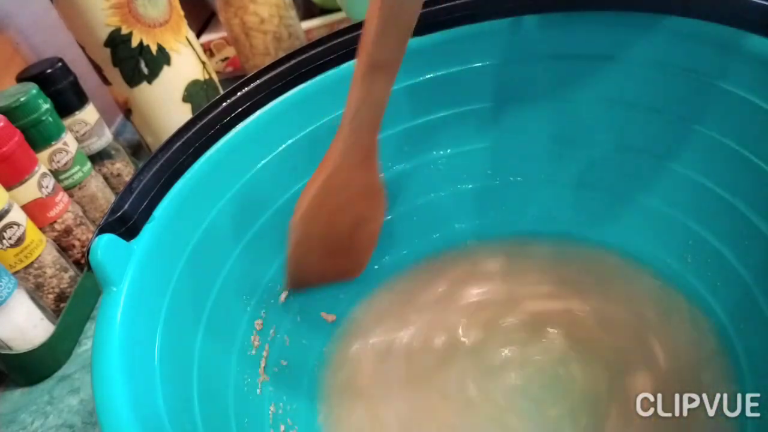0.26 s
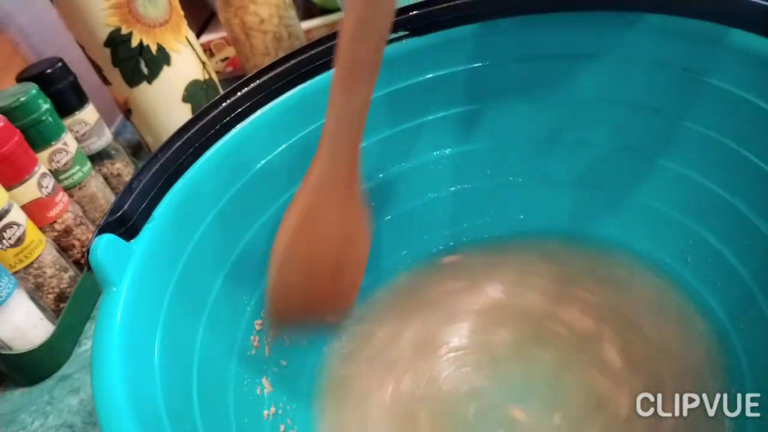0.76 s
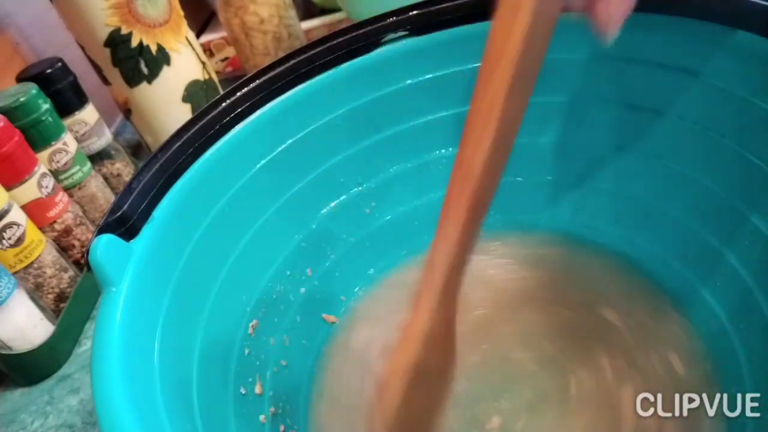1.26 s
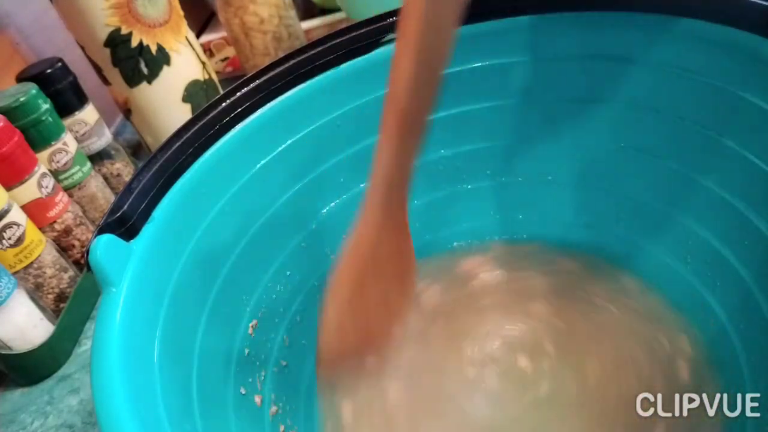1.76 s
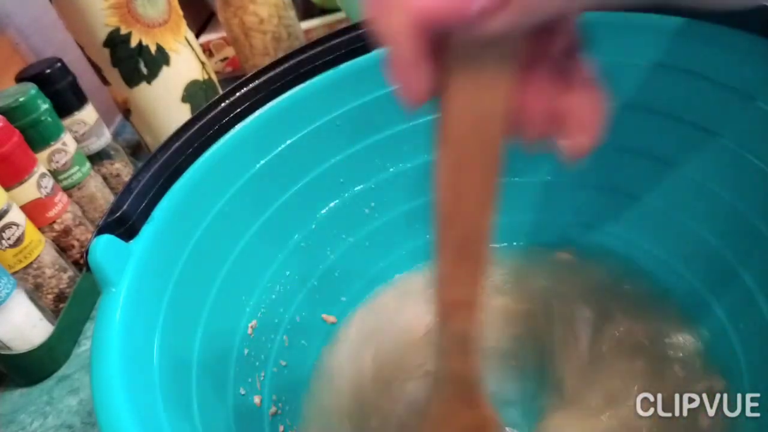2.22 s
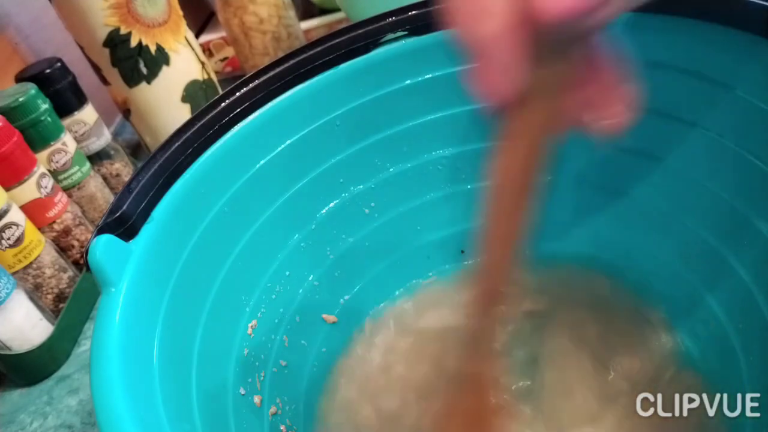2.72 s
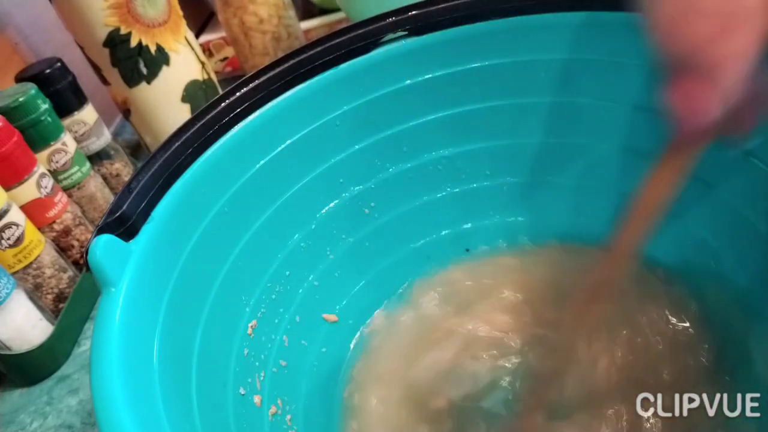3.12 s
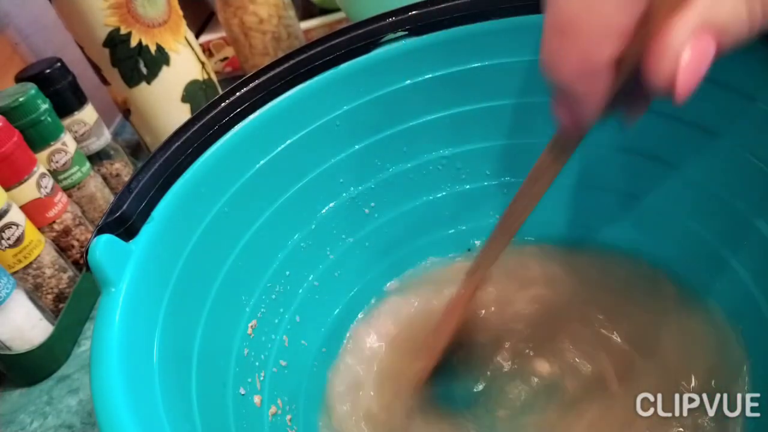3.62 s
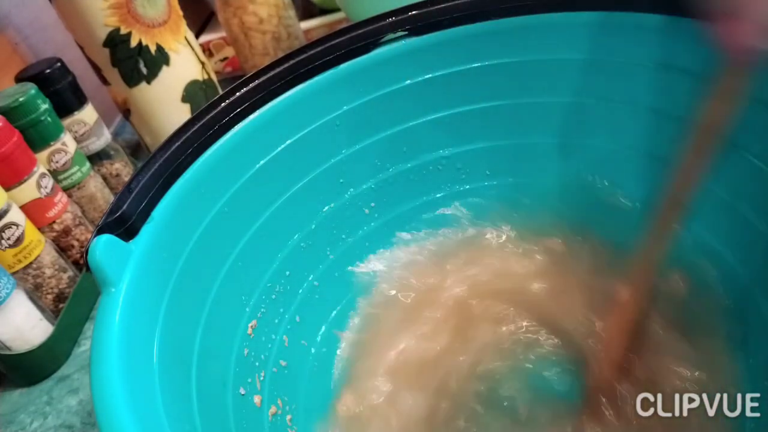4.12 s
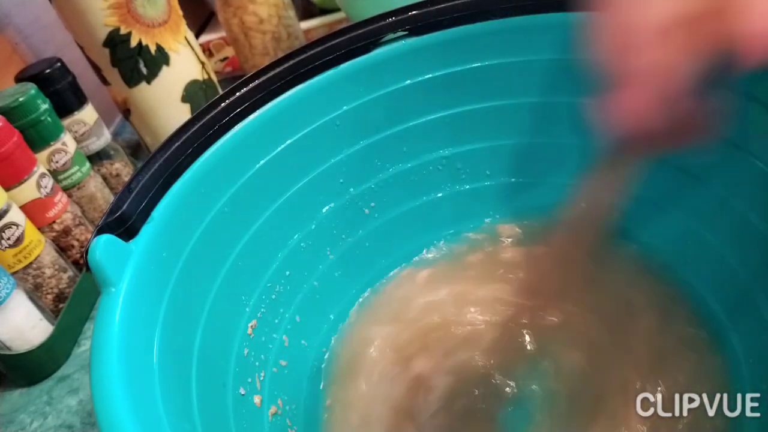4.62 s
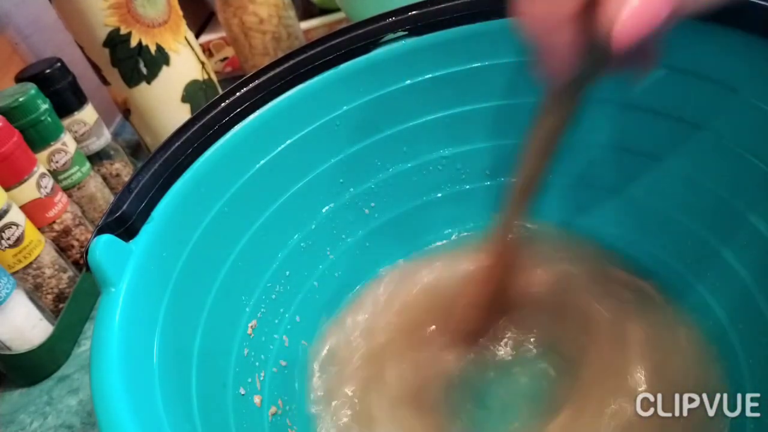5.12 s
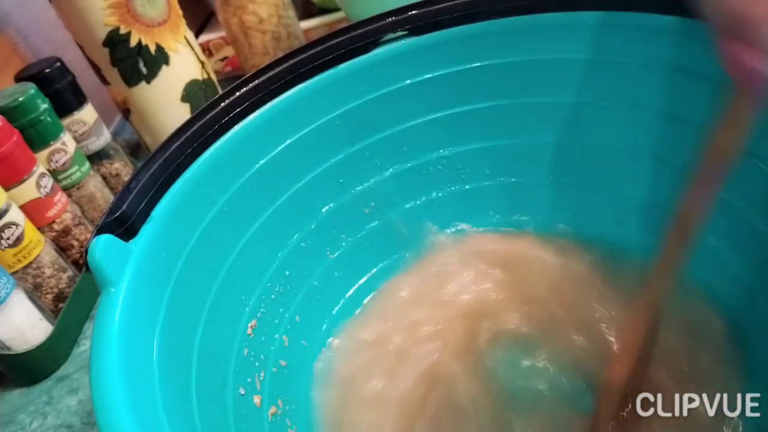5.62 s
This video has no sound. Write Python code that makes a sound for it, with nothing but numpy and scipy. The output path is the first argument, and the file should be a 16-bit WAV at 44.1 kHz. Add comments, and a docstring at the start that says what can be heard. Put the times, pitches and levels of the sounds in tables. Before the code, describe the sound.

A wooden spoon works in a large plastic bowl, close to the microphone in a small, quiet kitchen with very little echo. For the first 1.7 seconds it makes light, separate scrapes on the wet wall, with soft hollow thumps around 0.4, 0.8 and 1.2 seconds, tiny gritty ticks and near silence between strokes. At about 1.9 seconds fast, continuous stirring of thin liquid begins. The stretch up to 3 seconds is the loudest, with low, quickly damped bowl knocks, wooden clacks and splashy plops. From 3 seconds the knocks fall back and the liquid takes over, sloshing and gurgling in quick, uneven surges with a fizzy wet hiss, small bubble pops and sharp droplet clicks, one standing out near 3.8 seconds. Soft bowl thumps return from about 5 seconds, with a firmer one near 5.7, and the stirring continues to the end, just before 6 seconds.

```python
"""Wooden spoon stirring thin liquid

A large plastic bowl, close up in a small kitchen. The spoon scrapes the wall, thumps the bowl's low
modes, clacks and traps air pockets that plop; grit ticks under its edge and films of liquid snap.
Bowl and kitchen ring briefly; between strokes it is almost silent."""
import sys
import numpy as np
from scipy import signal
from scipy.fft import rfft, irfft, next_fast_len
from scipy.io import wavfile
from scipy.ndimage import uniform_filter1d, map_coordinates

SR = 44100
rng = np.random.default_rng(int(sys.argv[2]) if len(sys.argv) > 2 else 0)


def wrap_up_sound(samples):
    """Save the sound to the file named by the first command line argument, as 16-bit audio."""
    columns = np.atleast_2d(samples).T
    # keep every value between -1 and 1, then stretch to whole-number steps
    tamed = np.clip(columns, -1, 1)
    steps = np.round(tamed * 32767).astype(np.int16)
    wavfile.write(sys.argv[1], SR, steps)


N = 258853


def amp(db):
    """dB to gain."""
    return 10 ** (np.asarray(db) / 20)


def unit(x):
    """Scale to rms 1."""
    return x / np.sqrt(np.mean(x ** 2) + 1e-20)


def pan(balance_db):
    """Stereo gains for a left-over-right balance."""
    return amp([[balance_db / 2], [-balance_db / 2]])


def along(points, hz):
    """Interpolate (Hz, value) points on a log axis."""
    knot_hz, values = np.transpose(points)
    return np.interp(np.log(hz + 1), np.log(knot_hz + 1), values)


def wobble(rate_hz):
    """Smooth random curve."""
    knots = rng.standard_normal(int(N * rate_hz / SR) + 4)
    return map_coordinates(knots, [np.arange(N) * rate_hz / SR])


def filtered(x, response):
    """Apply a complex frequency response."""
    size = next_fast_len(N + SR // 2)
    return irfft(rfft(x, size) * response(np.fft.rfftfreq(size, 1 / SR)), size)[..., :N]


def low_cut(hz, corner_hz):
    """Fourth-order high-pass gain."""
    return 1 / (1 + (corner_hz / (hz + 1)) ** 4)


def resonant(modes, hz):
    """Causal response of (Hz, width Hz, dB) resonances, alternating in sign."""
    return sum((-1) ** k * amp(db) * 1j * hz * width_hz / (mode_hz ** 2 - hz ** 2 + 1j * hz * width_hz)
               for k, (mode_hz, width_hz, db) in enumerate(modes))


def gritty(response, grain_db, lump_db, patchy_db, width):
    """Coloured stereo noise, rms 1, uneven in fast grains, slow lumps and time-frequency patches."""
    # Each row: frequency in Hz, left-right likeness at width 1.
    likeness = [(60, 0.63), (180, 0.24), (550, 0.077), (1650, 0.06), (4970, 0.15), (15000, 0.097)]
    spectrum = signal.stft(rng.standard_normal((2, N)), nperseg=256)[2]
    patches = uniform_filter1d(rng.standard_normal(spectrum.shape[1:]), size=2, axis=0)
    patches = unit(uniform_filter1d(patches, size=14, axis=1))
    noise = signal.istft(spectrum * amp(patchy_db * patches), nperseg=256)[1][:, :N]
    noise *= amp(grain_db * wobble(600) + lump_db * wobble(45))
    angle = lambda hz: width * np.arccos(np.clip(along(likeness, hz), -1, 1)) / 2
    mid, side = filtered(noise, lambda hz: response(hz) * [np.cos(angle(hz)), np.sin(angle(hz))])
    return unit(np.array([mid + side, mid - side]))


def bubbles(low_hz, high_hz, decay_cycles, count):
    """Small bubbles ring with rising pitch at random times and pans; rms 1."""
    when, pitch, level, side = rng.random((count, 4)).T[:, :, None]
    t = np.arange(SR // 40) / SR
    cycles = low_hz * (high_hz / low_hz) ** pitch * t
    envelope = amp(12 * level) * np.exp(-cycles / decay_cycles) * (1 - np.exp(-cycles))
    rings = envelope * np.sin(2 * np.pi * cycles * (1 + 0.01 * cycles / decay_cycles))
    index = ((when * N).astype(int) + np.arange(len(t))).ravel()
    gains = np.cos(np.pi / 2 * side), np.sin(np.pi / 2 * side)
    return unit(np.array([np.bincount(index, (rings * gain).ravel(), N + SR)[:N] for gain in gains]))


def add(track, start_s, sound):
    """Mix a sound into a track."""
    first = round(start_s * SR)
    track[..., first:first + sound.shape[-1]] += sound


def still_air():
    """Faint, mostly low noise of the still kitchen."""
    # Each row: frequency in Hz, relative density in dB.
    colour = [(18, -44.5), (30, -20.5), (176, 8.5), (581, -24), (815, -29), (1270, -18), (2190, -34),
              (15000, -39.5)]
    noise = gritty(lambda hz: amp(along(colour, hz)), grain_db=4.5, lump_db=1, patchy_db=-2.5, width=1.1)
    return amp(-79.5) * noise


def stroke_levels_db():
    """Rumble, slosh, rub and hiss: each drag rises, holds and dies at the lift, over swirling liquid."""
    # Each row: start, rise and hold in seconds, rub level in dB, change over the hold in dB,
    # slosh and hiss over the rub in dB.
    drags = [(.05, 0.036, 0.0062, -46, 3.5, -38, 0), (.188, 0.0027, 0.1, -36.5, -33, 2, -5),
             (0.2, 0.031, 0.035, -53, -7, 9, 10), (0.303, 0.048, 0.0045, -56.5, -2.5, -3, 6),
             (0.362, 0.038, .01, -55.5, 3.5, -3, 7), (0.408, .002, 0.099, -33.5, -22.5, -5, -2.5),
             (0.695, 0.0025, 0.1, -31.5, -21.5, 0, -7.5), (0.786, .002, 0.079, -34.5, -23, -4, 2.5),
             (.877, 0.022, 0.065, -43.5, -21.5, -17, 5.5), (1.049, .045, 0.0074, -49.5, -12, -19, 6),
             (1.114, .008, 0.11, -49.5, -5, -21, 5.5), (1.185, .002, 0.099, -29.5, -36.5, -6, -8),
             (1.449, .002, 0.084, -35.5, -10.5, 2, -3.5), (1.533, 0.035, 0.047, -38.5, -10, -5, 8),
             (1.883, .002, 0.084, -36.5, -2, 10.5, -15), (1.979, 0.02, 0.014, -27.5, -14, -22, -10),
             (1.989, 0.082, 0.031, -44.5, -0.5, 6, 12), (2.087, .05, 0.033, -32, -9, 9, -6.5),
             (2.203, .002, 0.052, -18.5, -17.5, 3.5, -14.5), (2.238, .034, 0.023, -23.5, -6.5, -3, -3.5),
             (2.297, 0.019, 0.084, -24, -28, 6, -7.5), (2.455, .002, 0.014, -38, -12.5, 16, 0),
             (2.481, 0.066, 0.12, -38, -13.5, 1.5, -2), (2.608, 0.036, 0.07, -25.5, -22, -3, -9),
             (2.744, .002, 0.098, -33.5, -10, 2, -4.5), (2.885, .002, 0.052, -25.5, -13.5, -4, -8.5),
             (2.935, 0.0043, 0.093, -21, -20.5, 0.5, -8.5), (3.041, .002, 0.076, -20.5, -25, -18, -6.5),
             (3.118, .012, 0.021, -39, -13, 7.5, -4), (3.156, 0.028, 0.071, -39.5, -15, 11.5, -4),
             (3.292, 0.031, 0.08, -26, -10, -1, -6.5), (3.456, 0.0088, 0.15, -55.5, -11.5, 14, 3),
             (3.557, 0.084, 0.016, -37, 6.5, -14, -0.5), (3.642, .002, 0.15, -26, -6, -0.5, -5.5),
             (3.815, 0.0085, 0.1, -35, -5.5, -1, -1.5), (4, 0.0027, 0.11, -30.5, 0, -3, -4),
             (4.195, .003, .06, -45, -6.5, 4, 2), (4.3, 0.012, .02, -44, -5, 8, 3),
             (4.35, .002, 0.058, -38.5, -13.5, 9, 3.5), (4.396, 0.024, 0.091, -31, -7.5, 2.5, -6),
             (4.55, .01, 0.096, -45, -1, 6.5, 6), (4.719, .01, 0.024, -35.5, 2.5, -13, -2.5),
             (4.735, 0.039, 0.036, -25.5, -11, 8.5, -4.5), (4.785, 0.042, 0.034, -27.5, -8.5, 2.5, -3),
             (4.941, 0.012, 0.044, -43, 1, 12.5, 3), (4.959, 0.044, 0.084, -36.5, -9, 4, 10.5),
             (5.101, .012, 0.13, -35.5, 0.5, 3, 0), (5.313, 0.0026, 0.07, -44.5, 2, 7.5, 5),
             (5.407, .01, .02, -31.5, -10.5, -16, -3.5), (5.422, 0.027, 0.047, -44.5, 2, 8.5, 12),
             (5.454, 0.085, 0.092, -28.5, 1, 0.5, -3.5), (5.699, .003, 0.044, -28, -9.5, 3.5, -1.5),
             (5.723, .05, 0.1, -26.5, -9, -3.5, 1)]
    # Liquid moving between drags. Each row: time in seconds, swirl in dB, bowl rumble in dB.
    swirl = [(0, -78.5, -74.5), (1.0, -79, -71), (1.6, -99.5, -77), (1.72, -90, -81), (1.88, -101, -88),
             (2.02, -63.5, -37.5), (2.5, -49, -43), (2.95, -52, -42), (3.3, -50.5, -46), (3.5, -62, -67),
             (3.7, -44, -60), (4.25, -58.5, -49.5), (4.5, -59, -54.5), (4.9, -56.5, -51), (5.1, -64, -42.5),
             (5.3, -59.5, -45.5), (5.87, -45, -47.5)]
    t = np.arange(0, N, 32) / SR
    start_s, rise_s, hold_s, rub_db, change_db, slosh_db, hiss_db = np.transpose(drags)[:, :, None]
    held_s = t - start_s - rise_s

    def drag_power(over_db, change_share, lift_db_per_s):
        rising_db = 20 * np.minimum(held_s, 0) / np.maximum(rise_s, 1e-3)
        holding_db = change_share * change_db * np.clip(held_s / np.maximum(hold_s, 1e-3), 0, 1)
        lifting_db = -lift_db_per_s * np.maximum(held_s - hold_s, 0)
        return np.sum(amp(rub_db + over_db + rising_db + holding_db + lifting_db) ** 2, axis=0)

    slosh = drag_power(slosh_db, change_share=1.12, lift_db_per_s=494)
    rub = drag_power(0, change_share=1.03, lift_db_per_s=600)
    hiss = drag_power(hiss_db, change_share=0.74, lift_db_per_s=546)
    knot_s, swirl_db, rumble_db = np.transpose(swirl)
    swirl_power = lambda db: amp(np.interp(t, knot_s, db)) ** 2
    powers = [swirl_power(rumble_db) + amp(-15) ** 2 * slosh + amp(-8) ** 2 * hiss,
              swirl_power(swirl_db + 0.5) + slosh,
              swirl_power(swirl_db + 2) + rub,
              swirl_power(swirl_db + 4.5) + hiss]
    return [np.interp(np.arange(N) / SR, t, 10 * np.log10(power)) for power in powers]


def scrape():
    """The spoon drags on the wet wall: bowl rumble, hollow slosh, gurgling rub and fizzy hiss."""
    # Resonances the scrape excites. Each row: centre in Hz, width in Hz, gain in dB.
    low_modes = [(166, 35.4, -1), (200.7, 22, -3), (261, 77, -11.5)]
    wall_modes = [(1046, 230, 4), (1354, 120, 4.5), (1690, 130, 8.5), (2460, 1020, -6.5)]
    hollow_modes = [(345, 98, -4.5), (460, 69, 1), (523, 99, -0.5), (646, 57, 1.5), (845, 130, -5)]
    # Wet hiss. Each row: frequency in Hz, relative density in dB.
    hiss_colour = [(30, -20), (150, -34), (500, -12), (1470, -5.5), (2500, -8.5), (3370, -15.5),
                   (4550, -9.5), (5620, -9), (7750, 2.5), (8940, -11), (14100, -21.5), (14700, -15.5),
                   (15000, -66)]
    hiss_gain = lambda hz: amp(along(hiss_colour, hz))
    rumble_db, slosh_db, rub_db, hiss_db = stroke_levels_db()
    rumble = gritty(lambda hz: resonant(low_modes, hz) * low_cut(hz, 115),
                    grain_db=5, lump_db=4, patchy_db=-0.2, width=0.24)
    rub = gritty(lambda hz: resonant(wall_modes, hz) * low_cut(hz, 800),
                 grain_db=2.5, lump_db=0, patchy_db=4.5, width=1.166)
    slosh = gritty(lambda hz: resonant(hollow_modes, hz) * low_cut(hz, 200) / (1 + (hz / 1100) ** 4),
                   grain_db=2.5, lump_db=3.5, patchy_db=3.5, width=0.95)
    gurgle = filtered(bubbles(1001, 2800, decay_cycles=7.1, count=1200), lambda hz: low_cut(hz, 600))
    hiss = gritty(hiss_gain, grain_db=1.5, lump_db=1, patchy_db=5.5, width=0.86)
    fizz = unit(filtered(bubbles(2600, 11000, decay_cycles=39, count=3000), hiss_gain))
    drops = filtered(bubbles(1800, 7000, decay_cycles=12, count=250), lambda hz: low_cut(hz, 1200))
    return (amp(rumble_db) * rumble
            + amp(slosh_db - 2.5) * slosh
            + amp(rub_db) * (rub + amp(-8.5) * gurgle)
            + amp(hiss_db + 1.43) * (hiss + amp(-11) * fizz + amp(-18.5) * drops))


def ticks():
    """Grit and droplets under the spoon's edge: a sharp click and a short spray, ringing high."""
    # Each row: start in seconds, level in dB.
    events = [(0.0834, -20), (0.192, -23.5), (0.2289, -22.5), (0.4125, -15.5), (0.7881, -26.5),
              (1.1224, -23.5), (1.5497, -15.5), (1.5718, -12.5), (1.9121, -27), (2.0742, -22.5),
              (2.2563, -25.5), (2.2709, -5), (2.3965, -20), (2.4623, -23.5), (2.5077, -21.5), (2.5742, -11),
              (2.6184, -11.5), (2.9023, -13), (2.9398, -24), (3.043, -22.5), (3.3044, -20.5), (3.687, -15),
              (3.7224, -18.5), (3.8222, -3.5), (4.0027, -30.5), (4.0302, -18), (4.0716, -13.5),
              (4.3625, -17.5), (4.4511, -10), (4.5075, -26.5), (4.5607, -21), (4.7167, -17.5),
              (4.7563, -12.5), (5.003, -23), (5.1636, -21.5), (5.436, -12.5), (5.477, -11), (5.5523, -18),
              (5.6999, -31), (5.7772, -19.5)]
    # Tick resonances. Each row: centre in Hz, width in Hz, gain in dB.
    modes = [(4770, 4300, -23), (7380, 555, 3), (11400, 9100, -36.5)]
    click_t60_s, spray_t60_s = 0.0091, 0.061
    out, t = np.zeros((2, N + SR)), np.arange(SR // 20) / SR
    envelope = amp(-60 * t / click_t60_s) + amp(-60 * t / spray_t60_s)
    for start_s, db in events:
        balance_db = rng.normal(-2, 3)
        noise = rng.standard_normal(len(t)) + 0.19 * rng.standard_normal((2, len(t)))
        add(out, start_s, amp(db) * envelope * noise * pan(balance_db))
    return filtered(out[:, :N], lambda hz: resonant(modes, hz) / (1 + 1j * hz / 9000) ** 2)


def thumps():
    """A soft landing swells the bowl's ring; then spoon and liquid press on the wall and stop it."""
    # Each row: time in seconds, level in dB, main ring in Hz, hardness in dB, main t60 in seconds.
    landings = [(0.198, -24, 165.7, -10, 0.15), (0.423, -14.5, 160.2, -11.5, .15),
                (0.699, -25, 163, -3.5, 0.16), (0.794, -17, 164.4, -12.5, 0.27),
                (1.19, -13, 161.6, -22.5, .13), (1.455, -23.5, 165, -6.5, .21),
                (1.884, -22, 159.5, -14, 0.38), (1.91, -8.5, 155.3, 1, 0.14),
                (1.961, -8.5, 159.5, -1.5, 0.15), (2.212, -5, 160.6, -10.5, .17),
                (2.315, -4, 181.6, -21, 0.1), (2.458, -9, 160.7, -10, 0.16), (2.546, -13.5, 175.2, -4, .12),
                (2.766, -9.5, 163.4, -12, 0.15), (2.946, -27.5, 189.6, -8, 0.22),
                (3.828, -30, 162.7, -3.5, 0.18), (4.037, -28, 162.4, -5, 0.16),
                (4.954, -22.5, 164, -18, 0.23), (5.13, -21, 165.3, -3.5, 0.11), (5.326, -17, 163, -12, .16),
                (5.447, -27, 191, 1, 0.18), (5.712, -11, 166.4, -9.5, 0.29),
                (5.829, -12.5, 171.4, -20, 0.1)]
    # Bowl modes above the main ring. Each row: frequency in Hz, level in dB, t60 in seconds.
    upper_modes = [(233, 5.5, 0.079), (280, -3.5, 0.12), (340.3, -4.5, .08), (415.7, -4, 0.093),
                   (459, -4, 0.08), (515, -8, 0.041), (608, -5, 0.045), (680, 1.5, 0.022),
                   (733, -13.5, 0.03)]
    # Table thud, weaker once the spoon works in the liquid. Each row: time in seconds, dB over the ring.
    thud_levels = [(0, -22.5), (1.3, -17), (1.9, -10), (2.1, -36), (2.55, -25), (2.75, -35), (5.87, -33)]
    out, t = np.zeros((2, N + SR)), np.arange(SR // 4) / SR
    mode = lambda hz, t60_s, phase=0: amp(-60 * t / t60_s) * np.sin(2 * np.pi * hz * t + phase)
    fast_swell, slow_swell = 1 - np.exp(-(t / 0.0049) ** 2), 1 - np.exp(-t / 0.015)
    bite = 1 - np.exp(-np.maximum(t - 0.0035, 0) / 0.001)  # upper modes wait for firm contact
    damping = amp(-24 / (1 + np.exp((0.064 - t) / 0.0012)))
    for time_s, db, main_hz, hard_db, main_t60_s in landings:
        thud_db = np.interp(time_s, *np.transpose(thud_levels))
        ring = mode(main_hz, main_t60_s) * fast_swell
        ring += amp(-8.5) * mode(1.136 * main_hz, t60_s=0.18) * slow_swell
        ring += amp(thud_db) * mode(hz=79, t60_s=0.3) * slow_swell
        for mode_hz, mode_db, t60_s in upper_modes:
            scatter_db, detune, lag_rad = rng.normal(0, [3.1, 0.061, 0.4])
            loaded_hz = mode_hz * (1 + detune)  # the liquid's load shifts each mode
            mic_phases = np.array([[lag_rad], [-lag_rad]])
            gain = amp(mode_db + hard_db - 3 + scatter_db)
            ring = ring + gain * mode(loaded_hz, t60_s, mic_phases) * bite
        add(out, time_s - 0.004, amp(db + 4) * ring * damping)
    return out[:, :N] * pan(-0.8)


def plops():
    """Clacks and trapped air pockets: a brief ring of rising pitch inside a splash of noise."""
    # Each row: start in seconds, level in dB, nominal pitch in Hz, t60 in seconds, left over right in dB.
    events = [(0.413, -29.5, 1804, 0.043, 9), (0.7901, -34.5, 1800, .016, -9.5),
              (1.1851, -31, 1830, .017, -8.5), (1.4502, -33.5, 1170, 0.043, -3),
              (1.8823, -30.5, 1370, 0.052, 0), (1.91, -11.5, 1354, 0.023, -0.5),
              (1.962, -21.5, 1060, 0.021, -4), (1.9953, -7, 1370, 0.011, -1), (2.13, -21, 1658, 0.049, -7),
              (2.2043, -12.5, 1294, 0.028, 13), (2.2721, -17, 1605, .035, 3),
              (2.297, -19.5, 990, .019, -10), (2.3144, -13, 1080, 0.04, -2.5),
              (2.5759, -25, 2640, 0.038, 9), (2.6131, -22.5, 1040, 0.02, -9),
              (2.7187, -30.5, 2310, .021, -8), (2.7486, -22, 4280, 0.03, -3),
              (2.874, -33.5, 3580, 0.028, -6), (2.8879, -6.5, 1297, .037, -1),
              (2.9457, -6.5, 1740, 0.015, 1.5), (2.9506, -17.5, 3010, 0.019, -3),
              (3.046, -16, 1470, 0.058, -1), (3.1967, -25, 1980, 0.022, -5.5),
              (3.2892, -15.5, 1167, 0.035, -4.5), (3.6522, -12.5, 1760, 0.025, 6),
              (3.7152, -29.5, 1510, .021, -7), (4.0059, -21.5, 1720, 0.048, 14),
              (4.0357, -23.5, 631, 0.088, 0), (4.3104, -29, 3790, 0.045, 5), (4.355, -27, 610, 0.064, 1),
              (4.4218, -23.5, 1670, 0.033, -2), (4.45, -20, 1804, 0.026, -7.5),
              (4.454, -23.5, 2600, 0.029, -5.5), (4.509, -34, 3060, .023, -3.5),
              (4.5637, -27.5, 1215, 0.059, 0.5), (4.58, -30, 3080, 0.031, -1.5),
              (4.73, -21.5, 1476, .037, 5.5), (4.7704, -14.5, 1074, 0.022, -5),
              (4.7698, -17, 635, 0.057, 6), (4.8291, -20.5, 1760, 0.041, 5.5), (5.1197, -27, 943, .06, -10),
              (5.214, -26, 995, 0.026, -3), (5.2946, -34, 2850, 0.043, -10), (5.3182, -21, 606, 0.033, 2),
              (5.4177, -25.5, 2140, 0.054, -11.5), (5.4205, -22, 1246, 0.04, 4),
              (5.5299, -14.5, 1600, 0.017, -12.5), (5.6372, -23.5, 1750, 0.017, -4.5),
              (5.7045, -21, 1060, .026, 0)]
    splash_band_hz, splash_t60_s = [500, 2800], 0.035
    out, t = np.zeros((2, N + SR)), np.arange(SR // 10) / SR
    band = signal.butter(2, splash_band_hz, "band", fs=SR, output="sos")
    attack = 1 - np.exp(-t / 0.0001)
    for start_s, db, hz, t60_s, balance_db in events:
        tone = np.sin(2 * np.pi * hz * (0.97 * t + 1.8 * t * t)) * amp(db - 60 * t / t60_s) * attack
        splash = unit(signal.sosfilt(band, rng.standard_normal((2, len(t)))))
        splash *= amp(-21 + 0.68 * db - 60 * t / splash_t60_s)
        add(out, start_s, (tone + splash) * pan(balance_db))
    return out[:, :N]


def film_snaps():
    """Films of liquid burst with a dry, bright crack."""
    # Each row: start in seconds, level in dB.
    events = [(0.6967, -41.5), (2.2022, -41.5), (2.8882, -34.5), (3.0406, -30.5), (3.8185, -26.5),
              (4.3498, -40), (4.717, -40.5), (5.295, -41)]
    t60_s, low_cut_hz = 0.014, 3000
    out, t = np.zeros((2, N + SR)), np.arange(SR // 50) / SR
    for start_s, db in events:
        noise = rng.standard_normal(len(t)) + 0.6 * rng.standard_normal((2, len(t)))
        add(out, start_s, amp(db + 1 - 60 * t / t60_s) * noise)
    return filtered(out[:, :N], lambda hz: (1j * hz / (1j * hz + low_cut_hz)) ** 2)


def kitchen(x):
    """Short room tail, weak in the bass; each frequency dies at its own rate."""
    # Each row: frequency in Hz, t60 in seconds.
    decay = [(150, 0.24), (1500, 0.25), (8000, 0.18), (14000, 0.041)]
    bin_hz, t, spectrum = signal.stft(rng.standard_normal((2, SR // 2)), SR, nperseg=256)
    tail = signal.istft(spectrum * amp(-60 * t / along(decay, bin_hz)[:, None]), SR, nperseg=256)[1]
    delayed = np.pad(x, ((0, 0), (130, 0)))  # 3 ms
    reverb = signal.fftconvolve(delayed, tail / np.linalg.norm(tail[0]), axes=1)[:, :N]
    return filtered(reverb, lambda hz: 1j * hz / (1j * hz + 400))


def scene():
    """Short hits with their room tail, over still air and the scrape."""
    hits = thumps() + plops() + ticks() + film_snaps()
    return still_air() + hits + amp(-7.5) * kitchen(hits) + scrape()


def record(dry):
    """Phone microphones: peaks round off, the two sides differ in colour, deep bass and top are cut."""
    # Each row: frequency in Hz, left over right in dB.
    mic_balance = [(60, 5.5), (120, -2.5), (240, 3), (480, 3.5), (950, -1), (1890, 1), (3770, 0.5),
                   (7520, 0.5), (15000, 5.5)]
    ceiling, bass_hz, top_hz = 0.9, 70, 14400
    rounded = dry / (1 + np.abs(dry / ceiling) ** 4) ** (1 / 4)
    bass_cut = lambda hz: (1j * hz / bass_hz) ** 2 / (1 + 1.3j * hz / bass_hz - (hz / bass_hz) ** 2)
    colour = lambda hz: amp(np.outer([0.5, -0.5], along(mic_balance, hz)))
    return filtered(rounded, lambda hz: colour(hz) * bass_cut(hz) * (hz < top_hz))


dry = scene()
out = record(dry)
wrap_up_sound(out)
```